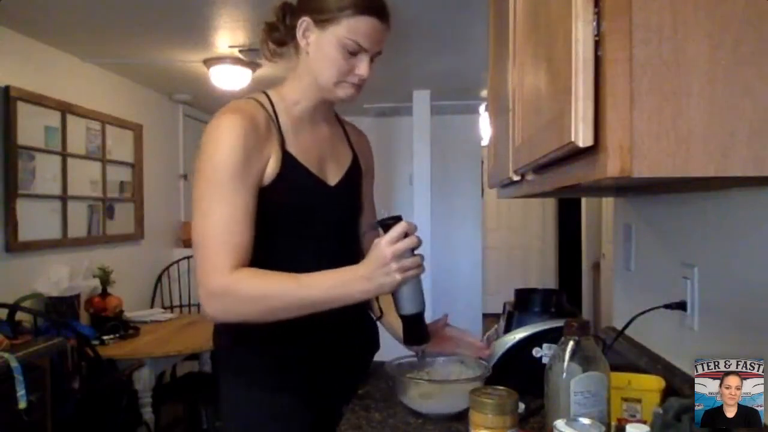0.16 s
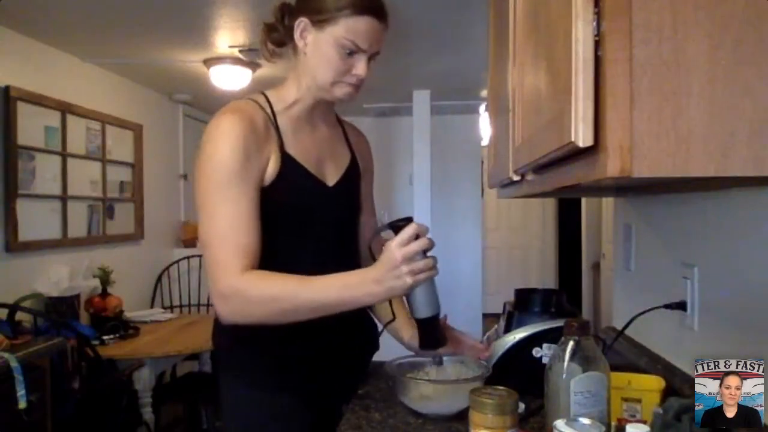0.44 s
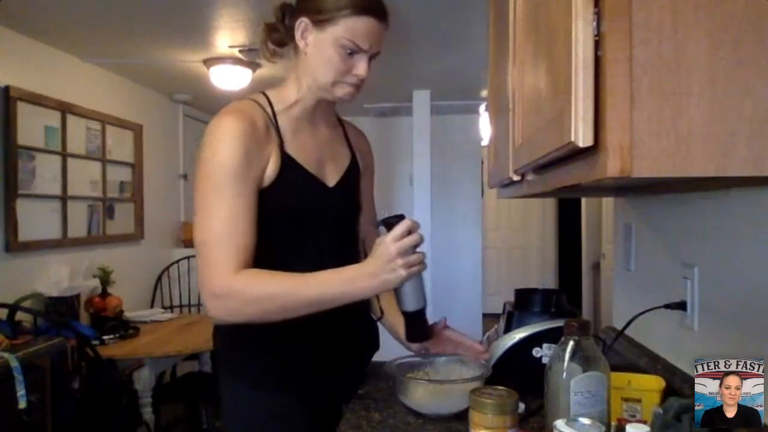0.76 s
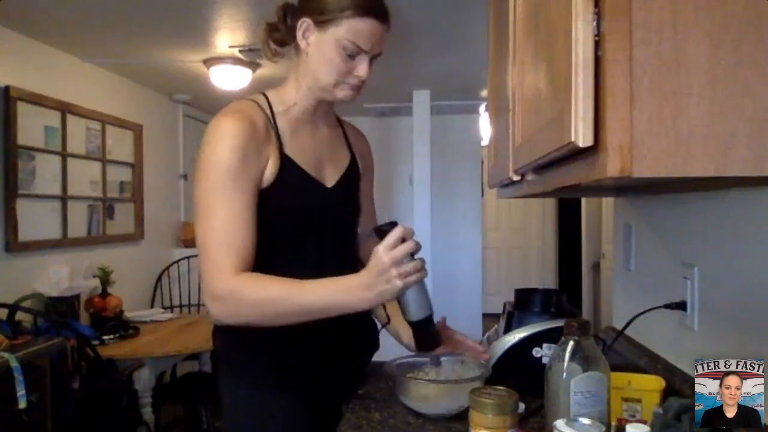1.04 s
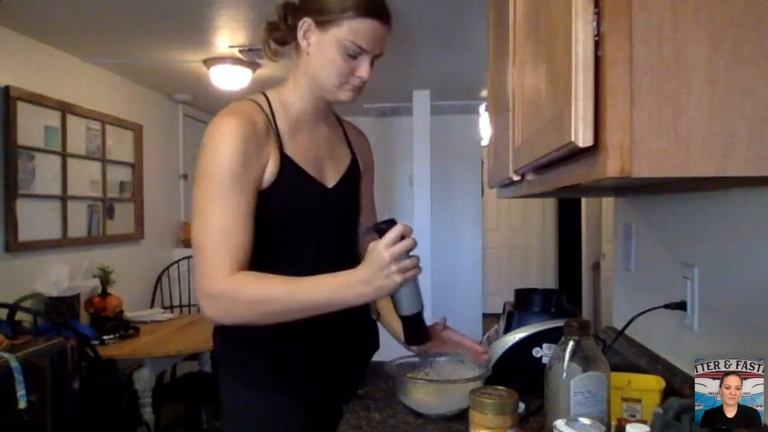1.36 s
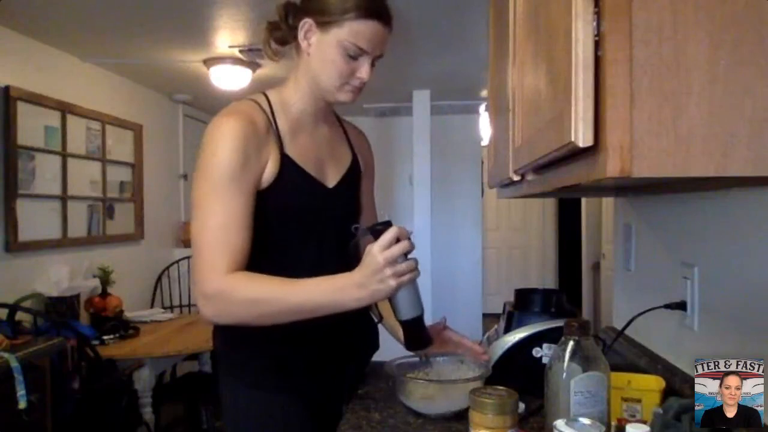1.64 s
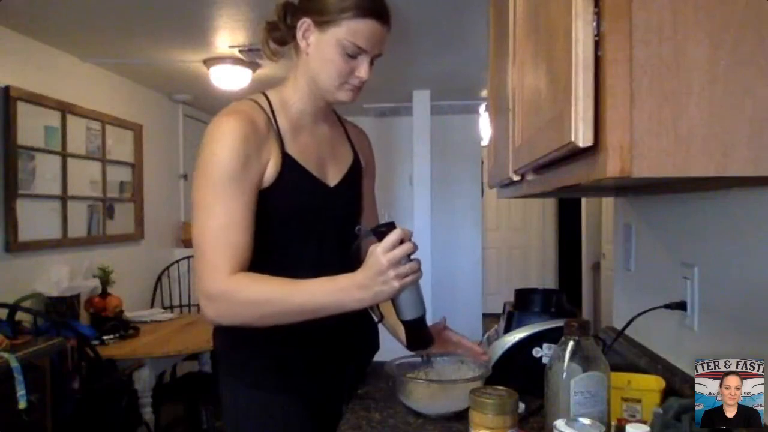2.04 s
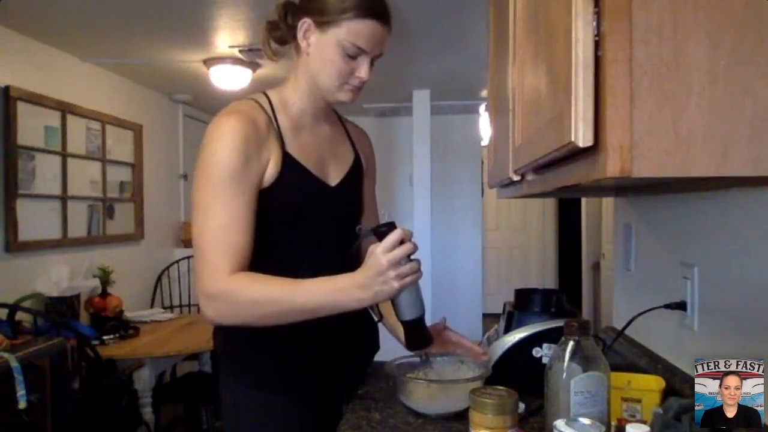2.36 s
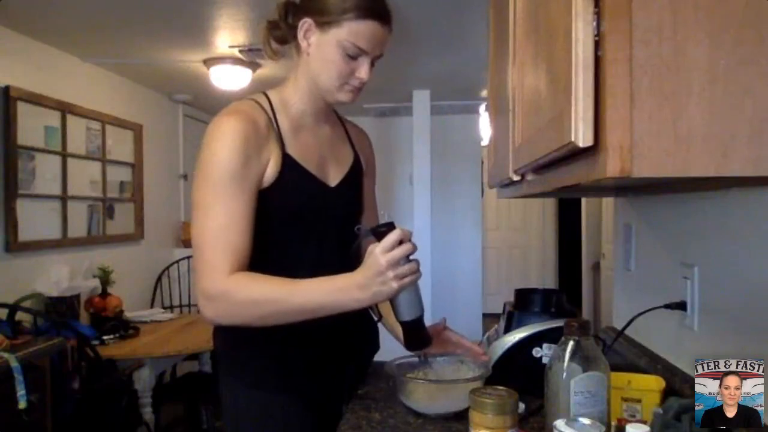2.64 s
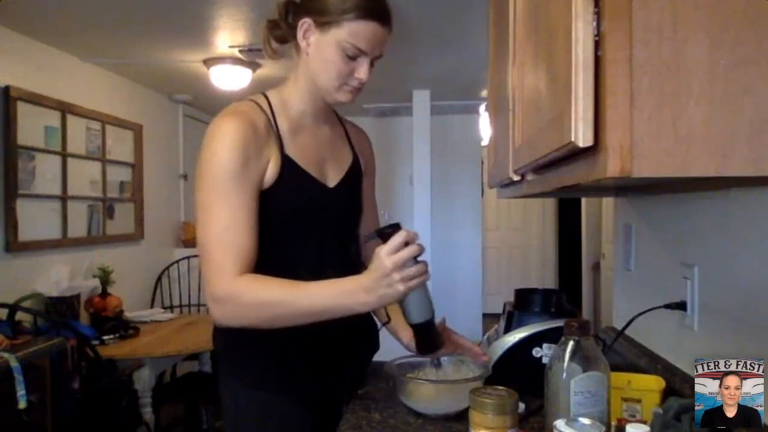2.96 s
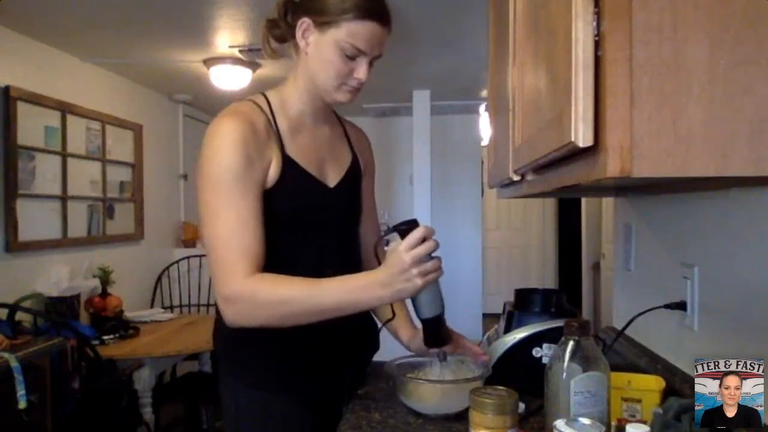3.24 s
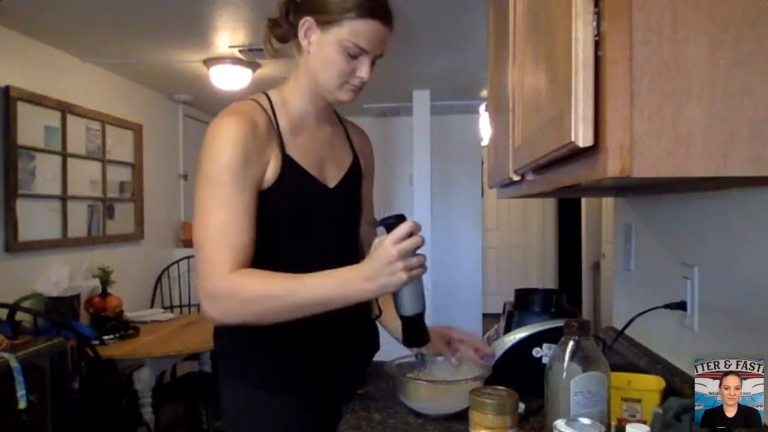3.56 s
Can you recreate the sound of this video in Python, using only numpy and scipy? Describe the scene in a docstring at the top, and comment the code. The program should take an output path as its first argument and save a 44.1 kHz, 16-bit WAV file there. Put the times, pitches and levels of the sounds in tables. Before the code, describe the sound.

Hand blender rattling and squealing in a bowl, soon settling quieter with brief cut-outs near the end.

```python
"""A loud, rattling whirr comes first: a hand blender whisks a thick mixture in a bowl on a kitchen counter.
Dense tiny knocks of the drive shake the housing and ring the steel whisk, with a throb at every turn.
The mixture spatters in wet plops; the bowl booms, is bumped and jolts the counter.
Squeals, where friction locks onto one whisk tone, and a scrape lead to a quieter whirr with chirps.
The sound dips or cuts out several times, and late on the treble widens between the ears."""
import sys
import numpy as np
from scipy import signal
from scipy.fft import rfft, irfft, next_fast_len
from scipy.io import wavfile

SR = 44100
rng = np.random.default_rng(int(sys.argv[2]) if len(sys.argv) > 2 else 0)


def int16_out(signal):
    """Quantize to a 16-bit WAV file."""
    q = np.round(np.clip(np.atleast_2d(signal).T, -1, 1) * 32767)
    wavfile.write(sys.argv[1], SR, q.astype(np.int16))


N = 163170
TIME = np.arange(N) / SR
FREQS = np.maximum(np.arange(N + 1) * SR / (2 * N), 1)


def from_db(db):
    """Turn decibels into gain."""
    return 10 ** (np.asarray(db) / 20)


def rms_one(x):
    """Scale a sound to unit power."""
    return x / np.sqrt(np.mean(x ** 2) + 1e-20)


def noise():
    """Plain white hiss."""
    return rng.standard_normal(N)


def in_time(rows):
    """Join the points of a table into a curve with a value at every sample."""
    return np.interp(TIME, *np.transpose(rows))


def shaped(x, gain):
    """Filter by a gain at each frequency."""
    return irfft(rfft(x, 2 * N) * gain)[:N]


def coloured(x, points, lift_db=0):
    """Filter by a table of levels, falling away further below its lowest point; unit power."""
    hz, db = np.transpose(points)
    curve_db = np.interp(np.log(FREQS), np.log(hz), db) + lift_db
    low_fall = np.minimum(FREQS / hz[0], 1) ** 2
    return rms_one(shaped(x, from_db(curve_db) * low_fall))


def drift(rate_hz):
    """Smooth random wandering around zero with spread 1; a higher rate wanders faster."""
    r = np.exp(-80 * np.pi * rate_hz / SR)
    # worked out at every 40th sample; the first 2000 values let the filter settle
    slow = signal.lfilter([1], [1, -2 * r, r * r], rng.standard_normal(N // 40 + 2002))[2000:]
    return np.interp(np.arange(N) / 40, np.arange(len(slow)), rms_one(slow))


def resonate(x, hz, width_hz):
    """Ring one resonance, longer when the width is small; unit power."""
    r = np.exp(-np.pi * width_hz / SR)
    return rms_one(signal.lfilter([1, 0, -1], [1, -2 * r * np.cos(2 * np.pi * hz / SR), r * r], x))


def bend(x, offset_hz):
    """Shift a ring up and down in pitch."""
    turning = np.exp(2j * np.pi * np.cumsum(offset_hz) / SR)
    return np.real(signal.hilbert(x, next_fast_len(N))[:N] * turning)


def wavering_tone(hz, wander_hz, rate_hz):
    """A sine whose pitch wanders at random."""
    return np.sin(2 * np.pi * np.cumsum(hz + wander_hz * drift(rate_hz)) / SR)


ROOM_T60_S, ROOM_DB = 0.19, -9.5  # time to fade by 60 dB; strength of the tail


def kitchen(x):
    """Add the short, dense echo of a small room, made of fading noise; unit power."""
    t = TIME[:SR // 2]
    tail = rng.standard_normal(len(t)) * from_db(-60 * t / ROOM_T60_S)
    tail = tail / np.linalg.norm(tail)
    return rms_one(x + from_db(ROOM_DB) * signal.fftconvolve(x, tail)[:N])


# Strength of the loud whirr at first. Each row: time in seconds, level in dB before later trims.
LOUD_WHIRR = [(0, -20.5), (.3, -21), (.45, -20.5), (.62, -21), (.668, -25.5), (.676, -19), (.70, -60),
              (.74, -41), (.8, -90)]
# Strength of the quieter whirr that follows. Each row: time in seconds, level in dB before later trims.
STEADY_WHIRR = [(.6, -37), (.67, -32), (.77, -34), (.81, -31.5), (1.15, -31.5), (1.3, -32), (1.9, -31),
                (2.6, -31), (2.86, -30.5), (2.91, -29.5), (3.0, -31.5), (3.15, -31), (3.42, -32.5),
                (3.7, -31)]


def whirr_levels():
    """Gains of the loud and the steady whirr, which cross over as the first one ends."""
    return from_db(in_time(LOUD_WHIRR)), from_db(in_time(STEADY_WHIRR))


TURN_HZ = 18.2  # whisk turns per second
TURN_AT_S, TURN_WANDER = 2.472, .05  # a moment of hardest rub, before slip; slip in turns


def whisk_turns():
    """Count the turns of the whisk, with a little random slip."""
    return TURN_HZ * (TIME - TURN_AT_S) + TURN_WANDER * drift(0.39)


IMPACTS_PER_S, IMPACT_SPREAD_DB = 5000, 1.5
HISS_SHARE = 0.8  # hiss against knocks
MOTOR_HZ, MOTOR_WANDER = 355.6, 0.0269  # revolutions per second; wander as a share of it
MOTOR_DEPTH_DB = 0.3  # swing up and down in every revolution


def impacts():
    """Tiny knocks of the drive over a rubbing hiss, swelling with each motor revolution."""
    sizes = from_db(IMPACT_SPREAD_DB * np.minimum(rng.exponential(1, N), 4)) * rng.choice([-1, 1], N)
    knocks = rms_one(sizes * (rng.random(N) < IMPACTS_PER_S / SR))
    revolutions = np.cumsum(MOTOR_HZ * (1 + MOTOR_WANDER * drift(2.66))) / SR
    swell = from_db(MOTOR_DEPTH_DB * np.cos(2 * np.pi * revolutions))
    return kitchen((knocks + HISS_SHARE * noise()) * swell)


# Near reflections from bowl, hand and counter.
# Each row: average delay in milliseconds, level in dB against the direct sound.
NEAR_REFLECTIONS = [(1.3, -19), (2.9, -17), (4.7, -16), (7.1, -16)]
SWAY_MS, SWAY_HZ = .18, .8  # how far and how fast the delays shift as the blender moves


def swaying(x):
    """Reflections with slowly changing delays carve drifting peaks and gaps into the sound."""
    echoes = np.zeros(N)
    for delay_ms, db in NEAR_REFLECTIONS:
        delay_s = (delay_ms + SWAY_MS * drift(SWAY_HZ)) / 1000
        echoes += from_db(db) * np.interp(TIME - delay_s, TIME, x)
    return rms_one(x + echoes)


# Colour of the rattle when loud. Each row: frequency in Hz, relative level in dB per Hz.
LOUD_RATTLE_COLOUR = [(250, -25), (570, -29), (660, -5.5), (870, -11), (1100, -8), (1550, -1), (1900, -4),
                      (2400, 0.5), (2850, 3.5), (3400, -1.5), (3900, -5), (4700, -8), (5400, 0), (6300, -2),
                      (6800, -5.5), (7900, -3.5), (8600, -7), (10400, -14), (11300, -28), (12000, -19)]
# Colour of the rattle when steady. Each row: frequency in Hz, relative level in dB per Hz.
STEADY_RATTLE_COLOUR = [(220, -12.5), (330, -10), (480, -5.5), (690, -5), (860, -10.5), (1100, -8.5),
                        (1550, -2.5), (1900, -3.5), (2400, -4), (2850, 3), (3400, -4), (3900, -5),
                        (4700, -11.5), (5400, -1), (6300, -5.5), (6800, -8.5), (7900, -4.5), (8600, -8.5),
                        (10300, -16.5), (11300, -28), (12000, -22)]
# Narrow resonances of housing and bowl.
# Each row: frequency in Hz, width in Hz, lift in dB (a minus sign makes a notch).
BODY_RESONANCES = [(347.6, 13, 10), (505, 32, 7.5), (680, 49, 2), (1170, 72, 3), (1420, 16, 1.5),
                   (1610, 270, 1.5), (2060, 9.7, -2.5), (2832, 44, -11.5), (4000, 300, -5.5),
                   (6400, 220, 2.5), (7200, 84, 3.5), (9500, 140, 2.5), (10510, 640, 5), (11500, 250, -5),
                   (11640, 220, 7)]
RATTLE_DB, RATTLE_THROB_DB, RATTLE_FLUTTER_DB = -1.5, .7, 0.37  # trim; swing per turn; random spread


def rattle(loud, steady, turns):
    """The knocks sound through the housing, whose resonances colour them, and swell once a turn."""
    drive = swaying(impacts())
    body_db = sum(db / (1 + (2 * (FREQS - hz) / width) ** 2) for hz, width, db in BODY_RESONANCES)
    out = loud * coloured(drive, LOUD_RATTLE_COLOUR, body_db)
    out = out + steady * coloured(drive, STEADY_RATTLE_COLOUR, body_db)
    throb_db = RATTLE_THROB_DB * np.cos(2 * np.pi * turns)
    return out * from_db(RATTLE_DB + throb_db + RATTLE_FLUTTER_DB * drift(22))


# The ringing tones of the steel whisk.
# Each row: frequency in Hz, width in Hz, level in dB against the loud whirr curve,
# level in dB against the steady one, throb in dB up and down, lag of the throb in turns.
WHISK_TONES = [(2655, 60, -16, -14.5, 3, 0), (2960, 170, -14, -18.5, 4.5, 0.64),
               (3095, 80, -18, -12.5, 2, 0.28), (5335, 150, -11, -11, 0.5, 0.13),
               (6150, 450, -17, -11, -0.5, 0.4), (7890, 190, -12, -12.5, -1, 0.086)]
RING_FLUTTER_DB = 0.5
MODE_WANDER = .004  # share by which the load of the mixture bends each tone


def whisk_ring(loud, steady, turns):
    """The knocks ring each whisk tone, which throbs once a turn and bends a little in pitch."""
    rub, out = impacts(), np.zeros(N)
    for hz, width, loud_db, steady_db, throb_db, lag in WHISK_TONES:
        swell = from_db(throb_db * np.cos(2 * np.pi * (turns - lag)) + RING_FLUTTER_DB * drift(37))
        ring = bend(resonate(rub, hz, width), hz * MODE_WANDER * drift(11.91))
        out += rms_one(ring * swell) * (loud * from_db(loud_db) + steady * from_db(steady_db))
    return out


PLOPS_PER_S, PLOP_SPREAD_DB, PLOP_DB = 110, 3.5, -19  # PLOP_DB is against the whirr curves
PLOP_CYCLES = 20  # cycles in which a plop dies by 60 dB
PLOP_LOW_HZ, PLOP_HIGH_HZ = 693, 2070


def mixture(loud, steady):
    """Air pockets pop at random in the mixture as short wet rings, harder when the blender is loud."""
    sizes = from_db(PLOP_SPREAD_DB * np.minimum(rng.exponential(1, N), 3)) * rng.choice([-1, 1], N)
    pops = sizes * (rng.random(N) < PLOPS_PER_S / SR)
    pitches = np.geomspace(PLOP_LOW_HZ, PLOP_HIGH_HZ, 36)
    dealt = rng.integers(0, len(pitches), N)  # which pitch each pop gets
    rings = np.zeros(N)
    for k, hz in enumerate(pitches):
        width_hz = np.log(1000) / np.pi * hz / PLOP_CYCLES
        rings += resonate(pops * (dealt == k) + 1e-18, hz, width_hz)
    return from_db(PLOP_DB) * kitchen(rings) * (loud + steady)


# Colour of the low rumble and of the faint floor. Each row: frequency in Hz, relative level in dB per Hz.
RUMBLE_COLOUR = [(25, -4), (60, -9), (110, -0.5), (220, 0), (300, -2.5), (500, -20)]
# Bumps of the whisk on the bowl.
# Each row: start in seconds, level in dB, pitch in Hz, rise to full swell in seconds.
BOWL_BUMPS = [(0.111, -36, 150, 0.017), (0.201, -35, 150, .012), (.277, -28, 151, 0.015),
              (0.445, -33, 150, .014), (.589, -26, 151, 0.021), (.662, -31, 145, 0.011),
              (.925, -36, 157, 0.0079), (1.058, -35, 161, 0.013), (1.504, -43, 151, .012),
              (1.678, -37, 150, 0.017), (1.783, -33.5, 157, 0.015), (1.93, -28.5, 154, 0.0092),
              (2.059, -36, 153, 0.017), (2.61, -41, 152, 0.0076), (2.872, -38.5, 152, 0.024),
              (3.154, -38, 148, 0.0074), (3.642, -39, 145, .009), (3.682, -28, 259, 0.0065)]
BOWL_HZ, BOWL_WIDTH_HZ, BOWL_WANDER_HZ = 151, 49, 5.02
BOWL_DB, RUMBLE_DB = -48, -53
CHURN_DB, CHURN_HZ = 1, 9  # random spread of the level and its rate
BUMP_THUD_DB = -15.5  # dull thud against the tone of the bump


def bowl():
    """The churned bowl booms at its low resonance; each soft bump adds a swell and a dull thud."""
    boom = resonate(resonate(noise(), BOWL_HZ, BOWL_WIDTH_HZ), BOWL_HZ, BOWL_WIDTH_HZ)
    boom = bend(boom, BOWL_WANDER_HZ * drift(13.3))
    rumble = coloured(noise(), RUMBLE_COLOUR)
    churn = from_db(CHURN_DB * drift(CHURN_HZ))
    out = (from_db(BOWL_DB) * boom + from_db(RUMBLE_DB) * rumble) * churn
    for start, db, hz, rise_s in BOWL_BUMPS:
        age = np.maximum(TIME - start, 0)
        swell = age / rise_s * np.exp(1 - age / rise_s)
        tone = swell ** 2 * np.sin(2 * np.pi * hz * age)
        thud = from_db(BUMP_THUD_DB) * swell * rumble
        out += from_db(db) * (tone + thud)
    return out


def faint_floor():
    """A very quiet, steady low noise that stays through the cut-outs."""
    return from_db(-79) * coloured(noise(), RUMBLE_COLOUR)


# Squeals of the whisk. Each row: start in seconds, length in seconds, pitch in Hz, level in dB.
WHISK_SQUEALS = [(0.042, 0.014, 5340, -23), (0.26, .016, 2640, -28), (0.289, 0.035, 2630, -24),
                 (.299, 0.0074, 6230, -19), (0.309, 0.0082, 6200, -23), (.353, 0.014, 2640, -21),
                 (0.382, 0.0098, 2670, -17), (0.403, .015, 2650, -19), (0.427, 0.015, 2720, -17),
                 (0.454, 0.028, 2670, -21), (0.459, 0.011, 3070, -18), (0.506, 0.024, 3050, -20.5),
                 (.51, 0.012, 2670, -24), (0.518, 0.0089, 8030, -18), (0.564, 0.011, 3076, -17.5),
                 (0.595, .018, 3070, -31), (0.608, .02, 3140, -23), (0.674, .081, 3117, -25.5),
                 (.674, 0.044, 2900, -28), (0.677, 0.017, 8070, -22.5), (0.699, 0.015, 7960, -28),
                 (0.695, 0.011, 5330, -24.5)]
EDGE_S = .006  # time to fade in or out
SQUEAL_WANDER_HZ, ROUGH_DB = 16, 1.8  # random spread of pitch and of level


def squeals():
    """Friction locks onto one whisk tone for a moment and gives a rough squeal."""
    out = np.zeros(N)
    for start, length, hz, db in WHISK_SQUEALS:
        nearest_end = np.minimum(TIME - start, start + length - TIME)
        gate = np.clip(nearest_end / EDGE_S + .5, 0, 1)
        out += gate * from_db(db + ROUGH_DB * drift(100)) * wavering_tone(hz, SQUEAL_WANDER_HZ, 133)
    return out


# Deep thuds of the bowl on the counter. Each row: start in seconds, level in dB.
COUNTER_JOLTS = [(.29, -51), (.635, -44), (1.915, -49)]
# Colour of those thuds. Each row: frequency in Hz, relative level in dB per Hz.
COUNTER_COLOUR = [(40, -7), (80, -2), (120, 2), (250, -32), (600, -70)]
JOLT_RISE_S = 0.019


def jolts():
    """The bowl jolts the counter: deep noise swells quickly and dies away."""
    thud, out = coloured(noise(), COUNTER_COLOUR), np.zeros(N)
    for start, db in COUNTER_JOLTS:
        age = np.maximum(TIME - start, 0) / JOLT_RISE_S
        out += from_db(db) * age * np.exp(1 - age) * thud
    return out


# Moments when the sound dips or cuts out.
# Each row: start in seconds, return in seconds, depth in dB.
SOUND_DIPS = [(0.646, 0.665, 10.5), (1.181, 1.201, 16), (1.6, 1.619, 9.5), (2.215, 2.248, 19),
              (2.789, 2.802, 13.5), (2.916, 2.988, 29.5), (3.01, 3.110, 38), (3.243, 3.332, 40.5),
              (3.347, 3.391, 18), (3.531, 3.553, 15), (3.589, 3.615, 16)]
DIP_CURVE, RETURN_S = 0.97, 0.0065  # shape of the fall (1 is straight); speed of the return


def dips():
    """Gain of the brief drop-outs: the level sinks steadily and snaps back."""
    db = np.zeros(N)
    for start, back, depth_db in SOUND_DIPS:
        sunk = np.clip((TIME - start) / (back - start), 0, 1) ** DIP_CURVE
        db -= depth_db * sunk * np.exp(-np.maximum(TIME - back, 0) / RETURN_S)
    return from_db(db)


SCRAPE_AT_S, SCRAPE_HZ, SCRAPE_WIDTH_HZ = .672, 2840, 480
SCRAPE_DB, SCRAPE_FALL_DB_PER_S = -28.5, 112


def scrape():
    """As the loud whirr ends, the whisk scrapes along the bowl: a ringing noise that fades."""
    age = np.maximum(TIME - SCRAPE_AT_S, 0)
    ring = resonate(resonate(noise(), SCRAPE_HZ, SCRAPE_WIDTH_HZ), SCRAPE_HZ, SCRAPE_WIDTH_HZ)
    return ring * np.minimum(age / EDGE_S, 1) * from_db(SCRAPE_DB - SCRAPE_FALL_DB_PER_S * age)


# Strength of the chirp that comes once a turn, barely there at first.
# Each row: time in seconds, level in dB before its random roughness.
CHIRP_STRENGTH = [(.75, -60), (.95, -42), (1.2, -42), (1.45, -46), (1.7, -40), (1.9, -40), (2.15, -44),
                  (2.3, -38), (2.65, -37), (2.75, -39), (2.9, -36.5)]
CHIRP_HZ, CHIRP_WANDER_HZ = 2632, 22


def chirps(turns):
    """Once a turn the whisk rubs hard enough to sing briefly near its lowest tone."""
    touch = (.5 + .5 * np.cos(2 * np.pi * turns)) ** 2
    level = from_db(in_time(CHIRP_STRENGTH) + ROUGH_DB * drift(110))
    return level * touch * np.sqrt(2) * wavering_tone(CHIRP_HZ, CHIRP_WANDER_HZ, 62.5)


# Colour of the treble that spreads late on. Each row: frequency in Hz, relative level in dB per Hz.
SPREAD_COLOUR = [(3000, -57), (4500, 7), (5500, -16), (8000, -7), (9500, 7), (11500, -7)]
SPREAD_FROM_S, SPREAD_DB = 3.11, -18  # level against the steady whirr curve


def treble_spread(steady):
    """Treble noise for the side signal, which is opposite in the two ears and so sounds wide."""
    return coloured(noise(), SPREAD_COLOUR) * steady * from_db(SPREAD_DB) * (TIME > SPREAD_FROM_S)


def scene():
    """Blender and bowl in the centre over a faint floor; the treble widens near the end."""
    loud, steady = whirr_levels()
    turns, gain = whisk_turns(), dips()
    blender = rattle(loud, steady, turns) + whisk_ring(loud, steady, turns) + chirps(turns)
    contact = squeals() + scrape() + bowl() + jolts()
    mid = (blender + mixture(loud, steady) + contact) * gain + faint_floor()
    side = treble_spread(steady) * gain
    return np.array([mid + side, mid - side])


CUTOFF_HZ = 12000


def record(dry):
    """Cut the top steeply above the cutoff."""
    low_pass = 1 / np.sqrt(1 + (FREQS / CUTOFF_HZ) ** 300)
    return np.array([shaped(x, low_pass) for x in dry])


dry = scene()
out = record(dry)
int16_out(out)
```